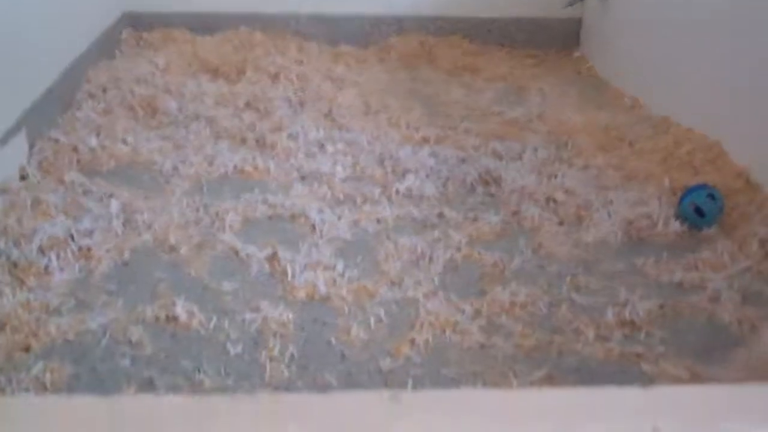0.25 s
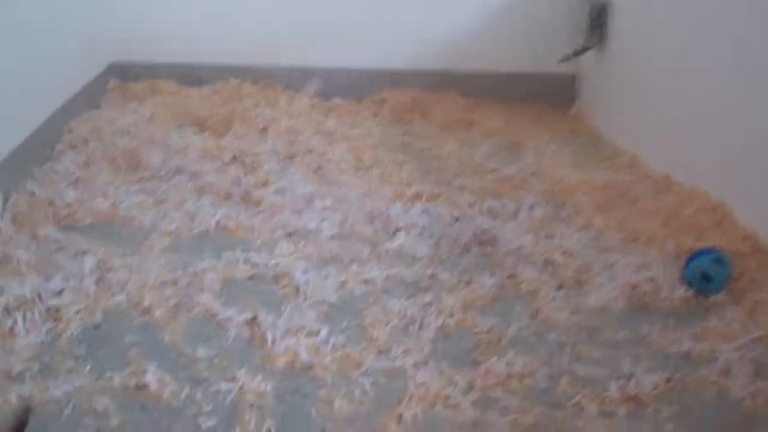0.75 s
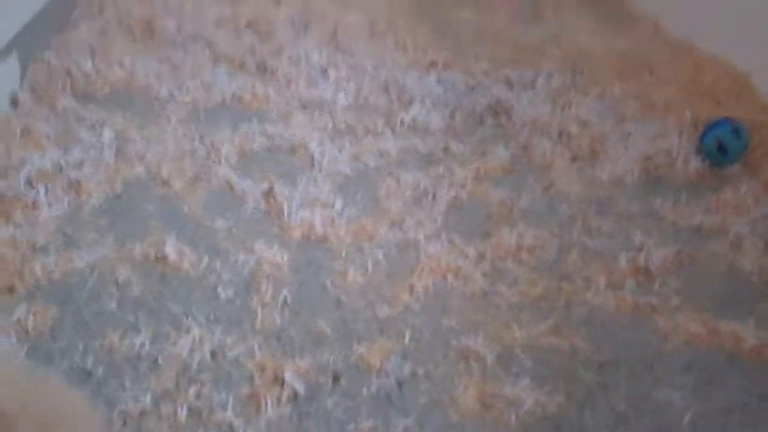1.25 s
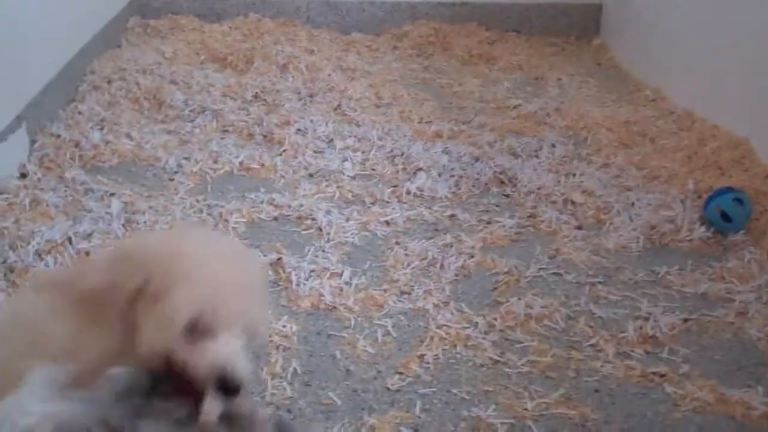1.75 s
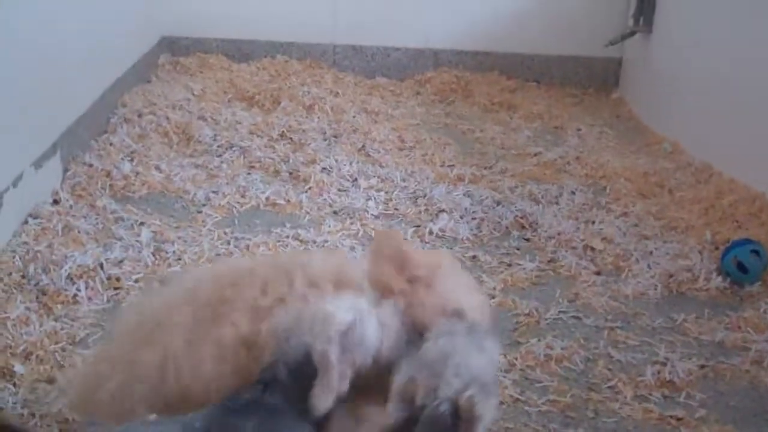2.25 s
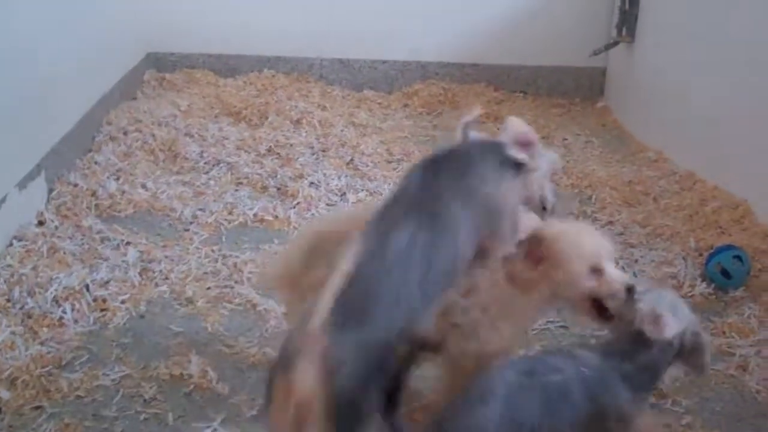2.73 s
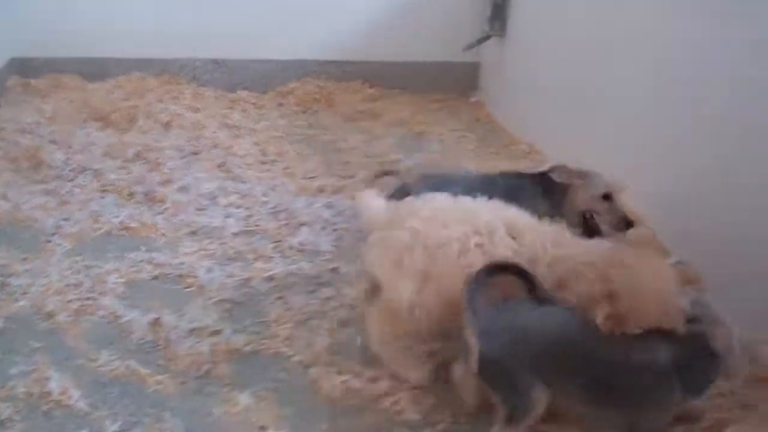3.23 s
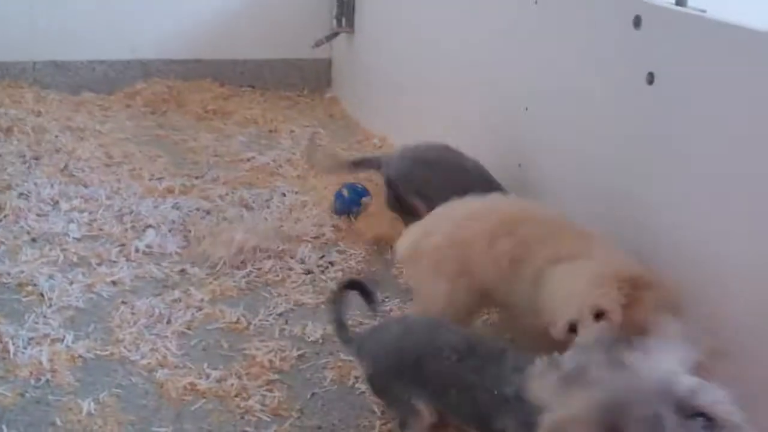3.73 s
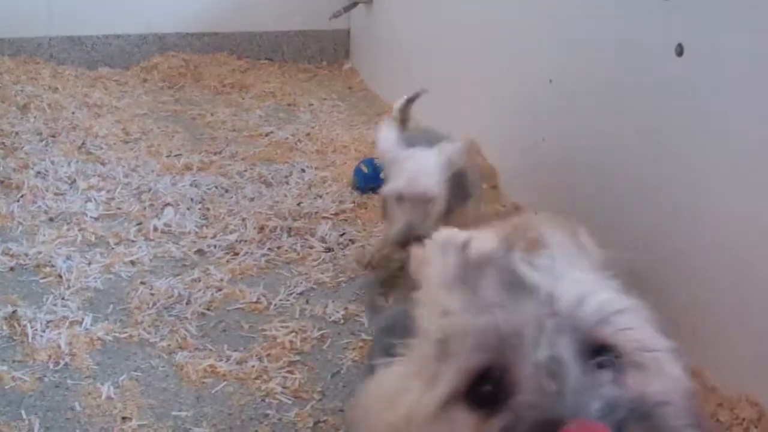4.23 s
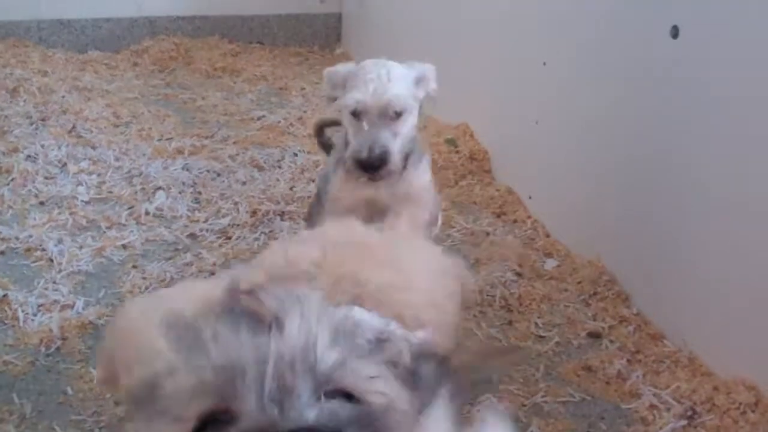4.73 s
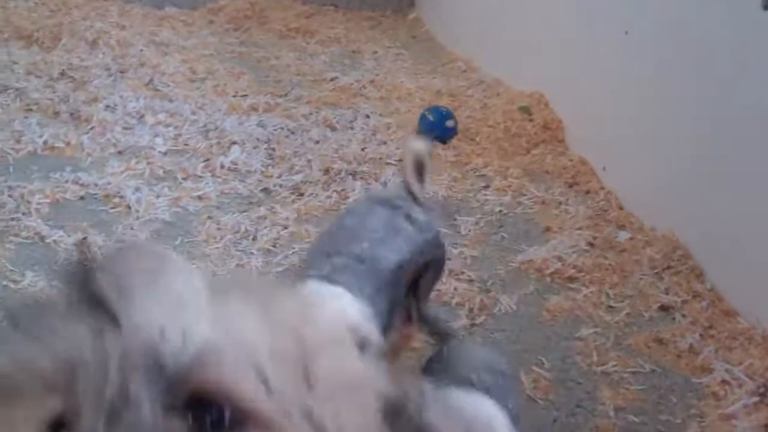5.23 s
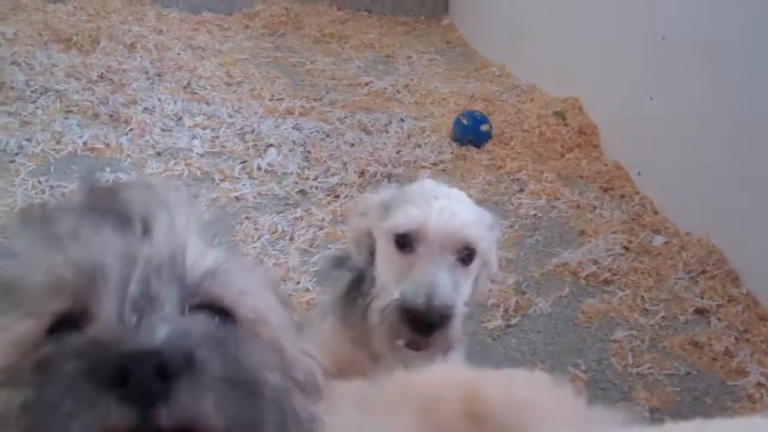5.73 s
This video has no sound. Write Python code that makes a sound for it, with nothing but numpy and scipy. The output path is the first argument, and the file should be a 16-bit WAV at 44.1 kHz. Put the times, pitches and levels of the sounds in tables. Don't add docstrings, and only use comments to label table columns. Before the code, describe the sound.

After a sliver of silence the sound opens abruptly on a shrill bark's tail and a whimper in a reverberant hard-walled pen with airy hiss. Around 0.3 s paws rustle through dry shreds with low thumps; at 0.4 s whimpers and a bark overlap. Softer barks and peeps follow near 0.8 s, a flicking yap at 1.2 s, then claw skids and another yap around 1.5 s. A loud yelp breaks at 1.8 s, leading into a thin, catching whine until 2.6 s, capped by a snarl. Hums, muffled barks and a piping squeak cluster at 3 s; a piercing cry with a wall slap comes at 3.4 s. From 4 s hoarse, roomy barks recur, near 4.0, 4.4, 4.9, 5.3 and 5.7 s, among tiny squeaks, a yelp at 4.9 s and dense scratching, sharp claw ticks and thuds. The litter moves from right through centre to left; a last rustle surges at the end.

```python
import sys
import numpy as np
from scipy import signal
from scipy.fft import rfft, irfft, next_fast_len
from scipy.io import wavfile
from scipy.ndimage import uniform_filter1d, map_coordinates

SR = 44100
rng = np.random.default_rng(int(sys.argv[2]) if len(sys.argv) > 2 else 0)


def ratio_of_db(decibels):
    return 10 ** (np.asarray(decibels, float) / 20)


def transcribe(u):
    v = np.clip(np.atleast_2d(u).T, -1, 1)
    q = np.round(v * 32767).astype(np.int16)
    wavfile.write(sys.argv[1], SR, q)


N = 263718

# [t/s, left lag/samples, left-right level/dB, wall echo level/dB]
LITTER_PLACE = [
    (0, 3.5, -6.5, -7.5),
    (1.5, 3.5, -2.5, -4.5),
    (2.7, 5, -7, -2.5),
    (3.5, 3.5, -0.5, -3.5),
    (4, 1, -1, -1.5),
    (4.7, 0.5, 1, -9.5),
    (5.3, -2.5, 2.5, -7),
    (6, 3.5, 1.5, -19),
]


def unit(x):
    return x / np.sqrt(np.mean(x ** 2) + 1e-20)


def along(points, hz):
    f, v = np.transpose(points)
    return np.interp(np.log(hz + 1), np.log(f + 1), v)


def curves(rows, t):
    s, *cols = np.transpose(rows)
    return [np.interp(t, s, c) for c in cols]


def wobble(rate, size=N):
    knots = rng.standard_normal(int(size * rate / SR) + 4)
    return map_coordinates(knots, [np.arange(size) * rate / SR])


def filtered(x, response):
    m = next_fast_len(N + SR // 2)
    return irfft(rfft(x, m) * response(np.fft.rfftfreq(m, 1 / SR)), m)[..., :N]


def throat(modes, turn=-1):
    def response(f):
        total = 0
        for k, (center, width, db) in enumerate(modes):
            damping = 1j * f * width
            total = total + turn ** k * ratio_of_db(db) * damping / (center * center - f * f + damping)
        return total
    return response


def glides(table, top_at, bend, sag, attack, release, second_db, third_db, opens_db, facing=1, creep=0):
    fade_db = 16
    mouth_hz, mouth_octaves, mouth_db = 4060, 0.21, 11
    for s, length, start_hz, top_hz, db in table:
        i = np.arange(round(s * SR), round((s + length) * SR))
        u = np.linspace(0, 1, len(i))
        before = np.clip(u / top_at, 0, 1)
        after = np.clip((u - top_at) / max(1 - top_at, .01), 0, 1)
        climb = creep * before + (1 - creep) * before ** bend
        hz = start_hz + (top_hz - start_hz) * climb - sag * top_hz * after ** 2
        closed = np.clip(1 - u / attack, 0, 1) + np.clip(1 - (1 - u) / release, 0, 1)
        level_db = db - fade_db * closed

        def overtone_db(k):
            octaves_off = np.log2(k * hz / mouth_hz) / mouth_octaves
            return level_db + opens_db * u + facing * mouth_db * np.exp(-octaves_off ** 2)

        yield i, hz, level_db, second_db + overtone_db(2), third_db + overtone_db(3)


def squeal(calls, jitter, flutter_db, fall_db, uneven=0):
    out = np.zeros(N)
    for i, hz, *db in calls:
        hz = uniform_filter1d(hz, size=350, mode="nearest")
        db += [db[2] - k * fall_db for k in range(1, 4)]
        phase = 2 * np.pi * np.cumsum(hz * (1 + jitter * wobble(196.6, size=len(i)))) / SR
        tone = 0
        for k, d in enumerate(db):
            partial = ratio_of_db(d + flutter_db * wobble(68.2, size=len(i))) * np.sin((k + 1) * phase)
            tone = tone + partial
        edge = np.clip(np.minimum(i - i[0], (i[-1] - i) / 3) / (0.00224 * SR), 0, 1)
        out[i] += np.sqrt(2) * tone * edge * (1 + uneven * np.cos(phase / 2))
    return out


def barks(table, modes, rough, muffle_hz, uneven=0, grain_db=3, turn=-1, passes=1, shut_count=9):
    shut, wide = np.zeros(N), np.zeros(N)
    for s, length, start_hz, held_hz, db in table:
        u = np.linspace(0, 1, round(length * SR))
        hz = held_hz + (start_hz - held_hz) * np.exp(-u / .26) - 0.064 * held_hz * u ** 3
        unsteady = rough * (0.0669 * wobble(253.0, size=len(u)) + 0.0907 * wobble(29.54, size=len(u)))
        cycle = np.cumsum(hz * (1 + unsteady)) / SR
        pulse = np.exp(14 * (np.cos(2 * np.pi * cycle) - 1)) * (1 + uneven * np.cos(np.pi * cycle))
        air = np.exp(2.2 * np.cos(2 * np.pi * cycle)) * rng.standard_normal(len(u))
        share = np.clip(rough, 0, 1)
        voice = np.sqrt(1 - share) * unit(np.gradient(pulse)) + 2.17 * np.sqrt(share) * unit(air)
        voice = unit(signal.lfilter(*signal.butter(2, muffle_hz, fs=SR), voice))
        voice *= ratio_of_db(db + grain_db * wobble(70, size=len(u)))
        voice *= np.abs(np.sin(np.pi * u ** .8)) ** 1.1
        mouth = np.clip(u / 0.4, 0, 1)
        shut[round(s * SR):][:len(u)] += voice * np.cos(np.pi / 2 * mouth)
        wide[round(s * SR):][:len(u)] += voice * np.sin(np.pi / 2 * mouth)
    out = filtered(wide, lambda f: throat(modes, turn)(f) ** passes)
    out += filtered(shut, lambda f: throat(modes[:shut_count], turn)(f / 0.784) ** passes)
    return filtered(out, lambda f: 2 * f ** 6 / (f ** 6 + 580 ** 6))


def yaps():
    # [t/s, length/s, start f/Hz, top f/Hz, level/dB]
    flicks = [(1.203, .048, 1545, 2566, -16)]
    # [t/s, length/s, start f/Hz, top f/Hz, level/dB]
    breaks = [(1.526, 0.076, 2163, 2934, -19.5)]
    # [t/s, length/s, start f/Hz, end f/Hz, level/dB]
    squeaks = [
        (4.702, 0.017, 867, 810, -22),
        (5.21, 0.0187, 1600, 1305, -14),
    ]
    # [t/s, length/s, start f/Hz, end f/Hz, level/dB]
    pipes = [
        (2.995, 0.061, 1784, 2200, -20.5),
        (3.048, 0.033, 1350, 1450, -28.5),
        (3.395, .017, 2605, 2533, -12.5),
        (4.897, 0.0085, 1420, 1600, -13),
        (5.459, .015, 1320, 1480, -18.5),
    ]
    calls = [
        *glides(flicks, top_at=0.61, bend=4.2, sag=0.355, attack=0.08, release=0.43,
                second_db=-27, third_db=-61, opens_db=22),
        *glides(breaks, top_at=.52, bend=4.8, sag=0.094, attack=0.032, release=0.17,
                second_db=-10.5, third_db=-26, opens_db=9, creep=0.335),
        *glides(squeaks, top_at=0.725, bend=1.5, sag=.01, attack=0.58, release=0.34,
                second_db=-12.5, third_db=-15.5, opens_db=-5),
        *glides(pipes, top_at=0.88, bend=1.14, sag=.03, attack=0.175, release=0.16,
                second_db=-22, third_db=-23, opens_db=.5, facing=0)]
    return squeal(calls, jitter=0.015, flutter_db=2.3, fall_db=25.0)


def yelps():
    # [t/s, length/s, start f/Hz, top f/Hz, level/dB]
    arched = [(4.897, 0.05, 1400, 2100, -17.5)]
    # [t/s, length/s, start f/Hz, top f/Hz, level/dB]
    hooked = [
        (1.772, 0.028, 1880, 2180, -29),
        (5.471, 0.0458, 1733, 2250, -19.5),
    ]
    # [t/s, length/s, start f/Hz, top f/Hz, level/dB]
    breaking = [(1.811, .056, 1519, 2645, -14.5)]
    calls = [
        *glides(arched, top_at=.44, bend=.55, sag=.35, attack=.03, release=.12,
                second_db=-12, third_db=-38, opens_db=-4),
        *glides(hooked, top_at=0.585, bend=0.96, sag=0.18, attack=0.047, release=0.38,
                second_db=-9, third_db=-33.5, opens_db=-16),
        *glides(breaking, top_at=.66, bend=17, sag=0.18, attack=0.073, release=0.18,
                second_db=-10, third_db=-26, opens_db=-9, creep=0.226)]
    return squeal(calls, jitter=0.027, flutter_db=4.5, fall_db=18)


def aimed_cry():
    # [t/s, length/s, start f/Hz, top f/Hz, level/dB]
    cries = [(3.408, 0.068, 2259, 2806, -13)]
    slap_s, slap_db = 0.032, -9
    calls = glides(cries, top_at=.65, bend=0.92, sag=0.067, attack=0.043, release=0.56,
                   second_db=-8.5, third_db=-26, opens_db=11.5)
    cry = squeal(calls, jitter=0.014, flutter_db=0.5, fall_db=15.0)
    return cry + ratio_of_db(slap_db) * np.roll(cry, round(slap_s * SR))


def whine():
    # [t/s, f/Hz, level/dB, third partial over first/dB]
    breath = [
        (1.938, 1270, -38.5, 11),
        (1.99, 1255, -39, -2),
        (2.056, 1440, -20.5, -12),
        (2.091, 1361, -26.5, -3),
        (2.164, 1409, -23.5, -10.5),
        (2.226, 1359, -27, 5),
        (2.289, 1406, -20.5, -11.5),
        (2.469, 1361, -30.5, 5.5),
        (2.575, 1312, -32.5, 1.5),
    ]
    catches, catch_s = [2.058, 2.218, 2.349, 2.47], .007
    second_db = -17
    cuts = [breath[0][0], *catches, breath[-1][0]]
    calls = []
    for a, b in zip(cuts, cuts[1:]):
        i = np.arange(round((a + catch_s) * SR), round(b * SR))
        hz, db, third_db = curves(breath, i / SR)
        calls.append((i, hz, db, db + second_db, db + third_db))
    return squeal(calls, jitter=0.0168, flutter_db=3.0, fall_db=15.5)


def near_barks():
    # [t/s, length/s, start f/Hz, top f/Hz, level/dB]
    bright = [(.79, 0.12, 777, 1322, -26.5)]
    # [t/s, length/s, start f/Hz, top f/Hz, level/dB]
    ruff = [(4.003, 0.0419, 702.4, 851, -24)]
    bright_calls = glides(bright, top_at=0.72, bend=2, sag=0.014, attack=0.64, release=0.37,
                          second_db=1, third_db=-5.5, opens_db=-1.5)
    ruff_calls = glides(ruff, top_at=.9, bend=1.1, sag=.01, attack=.05, release=.15,
                        second_db=-3, third_db=-5, opens_db=3)
    out = squeal(bright_calls, jitter=0.041, flutter_db=5.0, fall_db=13)
    return out + squeal(ruff_calls, jitter=0.0071, flutter_db=-5.5, fall_db=5.0, uneven=0.17)


def snarls():
    # [t/s, length/s, start f/Hz, held f/Hz, level/dB]
    growls = [
        (2.61, 0.091, 871.6, 900, -23),
        (3.995, 0.0607, 707, 850, -28.5),
    ]
    # [f/Hz, width/Hz, level/dB]
    modes = [
        (900, 90, -4.5),
        (1790, 195, 4.5),
        (2840, 700, -2),
        (3950, 190, 6),
    ]
    return barks(growls, modes, rough=0.61, muffle_hz=4950)


def moans():
    # [t/s, length/s, start f/Hz, end f/Hz, level/dB]
    hums = [
        (.87, .17, 830, 860, -33),
        (1.7, .12, 790, 840, -37),
        (2.97, .22, 815, 850, -29.5),
    ]
    calls = glides(hums, top_at=.8, bend=1.1, sag=.01, attack=.08, release=.25,
                   second_db=-5, third_db=-22, opens_db=-10, facing=0)
    return squeal(calls, jitter=0.023, flutter_db=2.5, fall_db=0)


def whimpers():
    # [t/s, length/s, start f/Hz, end f/Hz, level/dB]
    rough_whimpers = [
        (.07, 0.076, 1341, 1356, -17),
        (.392, 0.0473, 1228, 1360, -20.5),
        (.425, 0.035, 1274, 1355, -14),
        (.475, 0.092, 1300, 1223, -18.5),
        (1.655, 0.054, 1296, 1420, -28.5),
        (2.9, 0.0476, 1245, 1486, -26.5),
        (3.18, 0.049, 1760, 1952, -31),
        (3.32, 0.049, 1450, 1306, -33.5),
    ]
    # [t/s, length/s, start f/Hz, end f/Hz, level/dB]
    slides = [
        (1.385, 0.056, 1120, 1120, -42),
        (2.525, 0.1, 1295, 893, -42.5),
    ]
    # [t/s, length/s, start f/Hz, top f/Hz, level/dB]
    woofs = [
        (.43, .115, 572.5, 880.4, -25),
        (2.92, 0.13, 740, 822, -35),
    ]
    # [t/s, length/s, start f/Hz, held f/Hz, level/dB]
    peeps = [
        (.775, 0.048, 1307, 1292, -26.5),
        (.91, 0.047, 1399, 1297, -26),
        (1.34, 0.071, 1290, 1536, -31),
    ]
    whimper_calls = [
        *glides(rough_whimpers, top_at=0.806, bend=1.29, sag=.01, attack=0.4, release=0.26,
                second_db=-7.5, third_db=-9.5, opens_db=-1.5, facing=0),
        *glides(slides, top_at=0.8, bend=0.73, sag=.01, attack=0.34, release=0.06,
                second_db=15, third_db=8, opens_db=-10)]
    woof_calls = glides(woofs, top_at=.4, bend=.8, sag=0.012, attack=0.3, release=0.2,
                        second_db=1, third_db=0, opens_db=-1, facing=0)
    out = squeal(whimper_calls, jitter=0.044, flutter_db=7.0, fall_db=12)
    out += squeal(woof_calls, jitter=.014, flutter_db=4, fall_db=0)
    return out + barks(peeps, [(1750, 1000, 0.015)], rough=0.22, muffle_hz=1600)


def swells(s, db, rise, fall):
    rounding = 0.2
    swell_db, still_db = 21, -51
    late = np.arange(N) / SR - s[:, None]
    away = np.where(late < 0, -late / np.abs(rise)[:, None], late / np.abs(fall)[:, None])
    away = np.hypot(away, rounding) - rounding
    return np.sqrt(np.sum(ratio_of_db(db[:, None] - swell_db * away) ** 2, axis=0) + ratio_of_db(still_db) ** 2)


def patchy(x, depth_db):
    z = signal.stft(x, nperseg=256)[2]
    field = uniform_filter1d(rng.standard_normal(z.shape[1:]), size=9, axis=0)
    field = uniform_filter1d(field, size=8, axis=1)
    return signal.istft(z * ratio_of_db(depth_db * unit(field)), nperseg=256)[1][:, :N]


def paper():
    # [peak t/s, rustle level/dB, rise/s, fall/s, floor claws over rustle/dB]
    scrambles = [(0.271, -26.5, 0.076, 0.26, 7), (.49, -34.5, 0.31, 0.24, 1), (0.817, -33, 0.051, 0.12, 14),
                 (.955, -34, 0.051, 0.088, 11), (1.07, -33, 0.033, 0.14, 11),
                 (1.173, -30.5, 0.084, 0.24, 4.5), (1.477, -31, 0.071, 0.069, 9.5),
                 (1.73, -32, 0.06, 0.12, 8), (1.85, -35.5, 0.091, 0.17, 11), (2.09, -32, 0.06, 0.13, 7),
                 (2.205, -36, .02, 0.05, 10.5), (2.35, -39, 0.022, 0.088, 2),
                 (2.599, -33.5, 0.062, 0.17, 8), (2.82, -37, 0.13, 0.13, 2.5), (3.05, -42, 0.26, 0.21, 13),
                 (3.27, -28.5, 0.048, 0.23, 8), (3.35, -34, 0.037, 0.053, -8), (3.54, -36.5, 0.51, 0.12, 9),
                 (3.83, -33, 0.076, .2, -8), (3.97, -33.5, 0.21, 0.1, 11), (4.25, -33.5, 0.4, 0.13, 7),
                 (4.4, -27, 0.049, 0.12, 4.5), (4.5, -29, 0.067, 0.077, 5.5), (4.62, -32, 0.06, 0.038, 2),
                 (4.72, -33.5, 0.092, 0.052, 3.5), (4.85, -33.5, 0.062, 0.16, 11.5),
                 (4.949, -30, 0.23, 0.13, -5), (5.221, -31, 0.066, 0.3, 7.5),
                 (5.612, -26.5, 0.13, 0.045, 3.5), (5.75, -30, 0.046, 0.21, 4), (5.87, -30, 0.1, 0.068, -6),
                 (5.98, -21.5, 0.015, 0.09, 3.5)]
    # [f/Hz, level/dB]
    rustle = [(400, -22), (1500, -18), (2500, -13), (5500, 2), (8000, -1), (11000, 0.5), (14200, -1.5)]
    # [f/Hz, width/Hz, level/dB]
    scrape = [
        (2230, 880, -3),
        (4250, 870, 6.5),
    ]
    s, db, rise, fall, claws_db = np.transpose(scrambles)
    sizes = ratio_of_db(8.7 * np.minimum(rng.exponential(size=(3, N)), 3.5)) * rng.standard_normal((3, N))
    crackle = (rng.random((3, N)) < .03 * ratio_of_db(7 * wobble(40))) * sizes
    shreds = rng.standard_normal((3, N)) + 0.46 * unit(crackle)
    spread = diffuse(shreds[:2], [(100, 0.0029)]) + 0.47 * placed(shreds[2])
    stirred = ratio_of_db(1.6 * wobble(14) + 1.5 * wobble(45)) * unit(spread)
    leaf = filtered(swells(s, db, rise, fall) * stirred, lambda hz: ratio_of_db(along(rustle, hz)))
    scratch = filtered(swells(s, db + claws_db, rise, fall) * stirred, throat(scrape))
    return patchy(ratio_of_db(7.5) * leaf + ratio_of_db(4.0) * scratch, depth_db=2.5)


def snaps():
    # [t/s, tick peak level/dB, scuff over tick/dB]
    strikes = [(0.7505, -29, -9), (1.0303, -32, 20.5), (1.1592, -14.5, 13.5), (1.467, -22, -8),
               (1.4884, -10, 7), (1.5378, -8.5, 2.5), (.7913, -20, 10), (1.1016, -20, -3), (1.433, -37, -3),
               (1.7077, -17, 0), (2.0325, -25, 0), (2.2014, -26, 2), (2.3423, -33, 2), (2.5448, -27, 2),
               (2.5698, -19, 9.5), (3.8114, -17, 0), (4.8601, -14, 4), (5.9052, -21, 16.5), (3.346, -14, 0),
               (3.3955, -12, -16), (4.0014, -7.5, -1), (4.2264, -28, -4.5), (4.3744, -21, -4),
               (4.3982, -6.5, 5), (4.471, -13, 4.5), (4.5797, -18, -5), (4.612, -10.5, 6),
               (4.676, -4.5, -7), (4.718, -4.5, 0.5), (4.826, -4, -4), (5.1804, -10, -9), (5.2034, -4, 6.5),
               (5.4717, -24, 13.5), (5.567, -15, -2), (5.7105, -20, -1), (5.732, -21, 17.5),
               (5.81, -15.5, 16), (5.8437, -30, -12), (5.871, 1, 1), (5.9642, -10, 1)]
    tick, scuff, t = np.zeros(N + SR), np.zeros(N + SR), np.arange(SR // 10) / SR
    for s, db, scuff_db in strikes:
        tick[round(s * SR):][:len(t)] += ratio_of_db(db - 60 * t / .005) * rng.standard_normal(len(t))
        swell = t / 0.0093 * np.exp(1 - t / 0.0057)
        scuff[round(s * SR):][:len(t)] += ratio_of_db(db + scuff_db - 11.0) * swell * rng.standard_normal(len(t))
    claw = throat([(4000, 2700, -15), (11330, 640, 10.0)])
    return filtered(tick[:N], claw) + filtered(scuff[:N], lambda f: f ** 4 / (f ** 4 + 2600 ** 4))


def skids():
    # [t/s, peak level/dB, f/Hz, t60/s]
    scrapes = [(0.752, -16.5, 4120, .03), (0.954, -11.5, 3580, 0.028), (1.173, -7.5, 4000, 0.035),
               (1.4538, -3, 3950, 0.016), (1.4655, 0.5, 2920, 0.0091), (1.727, -6, 4040, 0.026),
               (3.396, 6.5, 2590, 0.023), (4.3753, -13, 4040, .02), (4.833, -3, 3500, 0.0084),
               (5.5944, -11.5, 3860, 0.036), (5.8272, -24, 2600, 0.034), (5.964, -19, 3300, .026)]
    out, t = np.zeros(N + SR), np.arange(SR // 10) / SR
    for s, db, hz, t60 in scrapes:
        rasp = np.sin(2 * np.pi * np.cumsum(hz * (1 + 0.044 * wobble(990, size=len(t)))) / SR)
        out[round(s * SR):][:len(t)] += ratio_of_db(db - 60 * t / t60) * (1 - np.exp(-t / 0.00095)) * rasp
    return out[:N]


def thumps():
    # [t/s, peak level/dB, f/Hz]
    thuds = [(0.276, -28, 333), (0.3, -12.5, 168), (0.36, -13, 233), (1.464, -10.5, 232),
             (1.675, -20.5, 239), (2.968, -13, 325), (3.668, -20.5, 108), (3.837, -16, 334),
             (3.977, -20, 407), (4.064, -18, 400), (4.34, -7, 160), (4.696, -17, 315), (4.868, -7, 576),
             (5.775, -17, 450), (5.14, -32, 205), (5.225, -17, 396)]
    # [peak t/s, level/dB, rise/s, fall/s]
    stomps = [(.31, -36, 0.1, 0.33), (.49, -40, 0.086, 0.11), (.8, -51, 0.14, 0.14),
              (1.1, -34.5, 0.05, 0.12), (1.479, -30.5, 0.054, 0.063), (1.68, -40.5, 0.11, 0.17),
              (2.2, -41, 0.12, 0.12), (2.58, -41.5, 0.076, 0.27), (2.99, -30.5, 0.12, 0.09),
              (3.36, -33, 0.28, 0.083), (3.54, -40.5, 0.11, 0.19), (3.67, -35.5, 0.018, 1),
              (3.98, -29, 0.29, 0.079), (4.34, -32, 0.041, 0.11), (4.72, -32.5, 0.039, 0.21),
              (4.79, -36, 0.072, 0.11), (4.88, -28, 0.078, 0.037), (5.162, -42.5, 0.39, 0.9),
              (5.78, -32, 0.081, 0.038)]
    # [f/Hz, level/dB]
    boards = [(15, -55), (30, -25.5), (110, -11.5), (220, -8.5), (350, -6), (550, -6), (900, -5.5),
              (1500, -120)]
    falls, t = np.zeros(N + SR), np.arange(SR // 4) / SR
    for s, db, hz in thuds:
        ring = np.sin(2 * np.pi * hz * t) * (1 - np.exp(-t / 0.0085))
        falls[round(s * SR):][:len(t)] += ratio_of_db(db - 11.0 - 60 * t / 0.14) * ring
    drumming = unit(ratio_of_db(2.2 * wobble(21.73)) * diffuse(rng.standard_normal((2, N)), boards))
    return falls[:N] + ratio_of_db(-4.0) * swells(*np.transpose(stomps)) * drumming


def far_barks():
    # [t/s, length/s, start f/Hz, held f/Hz, level/dB]
    shrill = [
        (.05, .13, 793, 858, -19),
        (.425, 0.11, 577.4, 877, -21),
        (2.93, 0.114, 785, 829, -34),
        (3.5, 0.54, 633, 657, -48.5),
    ]
    # [f/Hz, width/Hz, level/dB]
    shrill_throat = [(874, 350, 4), (1590, 770, 4), (2700, 180, 3.5), (3507, 770, 12.5), (3665, 2020, 7),
                     (4940, 280, 5)]
    # [t/s, length/s, start f/Hz, held f/Hz, level/dB]
    muffled = [
        (.86, 0.18, 810.4, 860, -27),
        (1.13, 0.056, 760, 860, -33),
        (1.69, 0.1, 769, 864, -35),
        (2.66, 0.141, 865, 856, -44.5),
        (2.95, 0.18, 831.4, 870, -29.5),
    ]
    # [f/Hz, width/Hz, level/dB]
    muffled_throat = [(860, 460, 0), (1750, 270, 3.5), (4040, 360, -10.5)]
    out = barks(shrill, shrill_throat, rough=.38, muffle_hz=6760)
    return out + barks(muffled, muffled_throat, rough=.3, muffle_hz=2200)


def hoarse_barks():
    # [t/s, length/s, start f/Hz, held f/Hz, level/dB]
    hoarse = [
        (4.04, 0.18, 652.7, 900, -29.5),
        (5.28, 0.19, 681, 875.5, -29.5),
        (5.695, 0.23, 684.3, 882, -31),
    ]
    # [f/Hz, width/Hz, level a pass/dB]
    hoarse_throat = [(940, 420, 6), (1454, 310, 4), (2470, 270, -2)]
    # [t/s, length/s, start f/Hz, held f/Hz, level/dB]
    gruff = [
        (4.36, 0.22, 621.6, 860, -31.5),
        (4.86, 0.21, 560, 870, -31.5),
    ]
    # [f/Hz, width/Hz, level a pass/dB]
    gruff_throat = [(943, 467, 7), (1400, 193, 5.5), (2250, 470, -2.5)]
    voice = dict(rough=.35, muffle_hz=2400, uneven=.45, grain_db=1.8, turn=1, passes=2, shut_count=1)
    return barks(hoarse, hoarse_throat, **voice) + barks(gruff, gruff_throat, **voice)


def placed(x):
    i = np.arange(N)
    lag, side_db, _ = curves(LITTER_PLACE, i / SR)
    return np.array([ratio_of_db(e * side_db / 2) * map_coordinates(x, [i - e * lag / 2]) for e in (1, -1)])


def walls(x):
    # [delay t/s, level/dB]
    echoes = [
        (.004, -8),
        (.0085, -8),
        (.012, -11),
        (.017, -12),
        (.021, -11),
        (.026, -14),
        (.032, -14),
    ]
    stretch = np.array([[.94], [1.07]])
    return filtered(x, lambda f: sum(ratio_of_db(db) * np.exp(-2j * np.pi * f * s * stretch) for s, db in echoes))


def diffuse(pair, spectrum):
    # [f/Hz, likeness]
    likeness = [(60, 1), (500, 0.96), (1500, 0.57), (5000, 0.0081), (15000, 0.024)]

    def mix(hz):
        angle = np.arccos(np.clip(along(likeness, hz), -1, 1)) / 2
        return ratio_of_db(along(spectrum, hz)) * [np.cos(angle), np.sin(angle)]

    mid, side = filtered(pair, mix)
    return np.array([mid + side, mid - side])


def room(x, count=2):
    # [f/Hz, t60/s]
    decay = [(200, 0.5), (1000, 0.76), (3000, 0.6), (10000, 0.42)]
    out = np.zeros((2, N))
    for k in range(count):
        hz, t, z = signal.stft(rng.standard_normal((2, SR // 2 + SR // 4)), SR, nperseg=256)
        tail = signal.istft(z * ratio_of_db(-60 * t / along(decay, hz)[:, None]), SR, nperseg=256)[1]
        tail = tail / np.linalg.norm(tail[0])
        share = np.cos(np.pi * (np.arange(N) / SR * 5.3 + k / count)) ** 2
        late = np.pad(x * share, (260, 0))[None]
        out += signal.fftconvolve(late, tail, axes=1)[:, :N]
    return diffuse(out, [(100, 0)])


def room_air():
    # [f/Hz, level/dB]
    hiss = [(15, -70), (45, -36), (156, 0.5), (604, -6), (900, 4), (3050, 6), (4080, 10), (5040, 2.5),
            (14200, -0.5)]
    return ratio_of_db(-37.0) * unit(diffuse(rng.standard_normal((2, N)), hiss))


def scene():
    near = yaps() + yelps() + aimed_cry() + whine() + near_barks() + snarls() + moans()
    aside = whimpers()
    far = far_barks()
    hoarse = hoarse_barks()
    direct = ratio_of_db(4.0) * near + ratio_of_db(-0.5) * aside + ratio_of_db(-1.5) * far + ratio_of_db(-1.0) * hoarse
    direct += snaps() + skids()
    thrown = ratio_of_db(curves(LITTER_PLACE, np.arange(N) / SR)[2])
    to_room = ratio_of_db(-3.0) * thrown * near + ratio_of_db(-1.0) * aside + far + ratio_of_db(-4.0) * hoarse
    wet = walls(thrown * direct) + room(to_room)
    return placed(direct) + wet + paper() + thumps() + room_air()


def roll_off(x):
    return signal.sosfilt(signal.butter(12, 15370, fs=SR, output="sos"), x)


def record(dry):
    start_s, fade_s, top_hz = .1075, 0.0024, 14230
    opening = np.clip((np.arange(N) / SR - start_s) / fade_s, 0, 1)
    x = filtered(dry, lambda hz: hz < top_hz) * opening
    return roll_off(np.clip(x, -1, 1))


dry = scene()
out = record(dry)
transcribe(out)
```